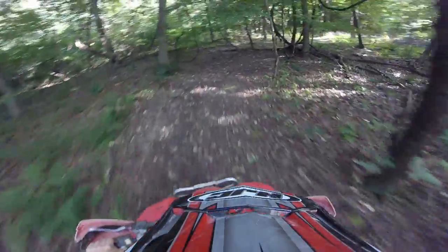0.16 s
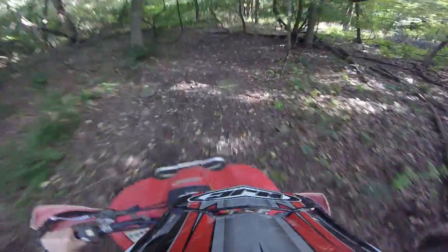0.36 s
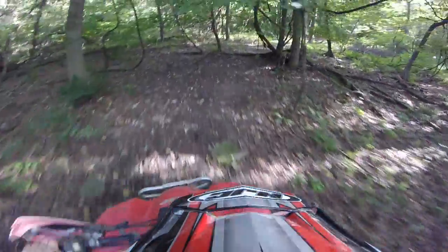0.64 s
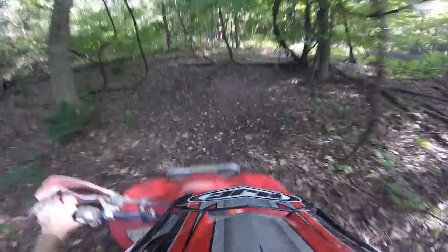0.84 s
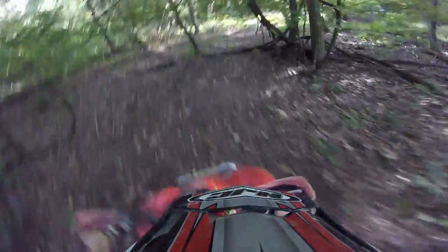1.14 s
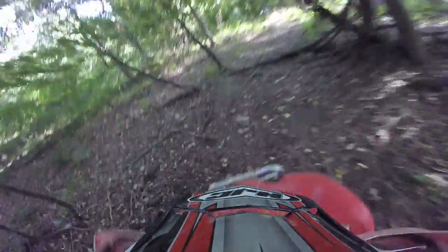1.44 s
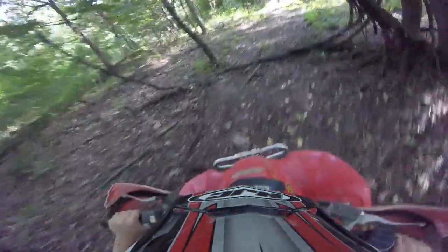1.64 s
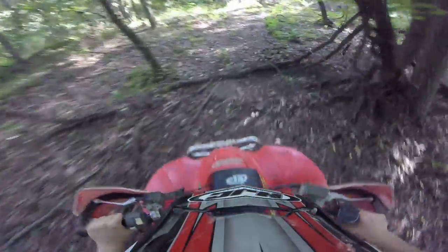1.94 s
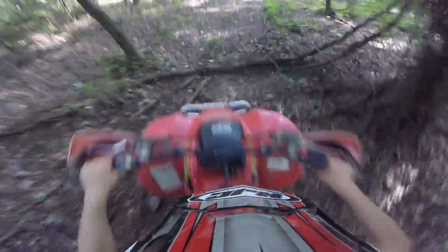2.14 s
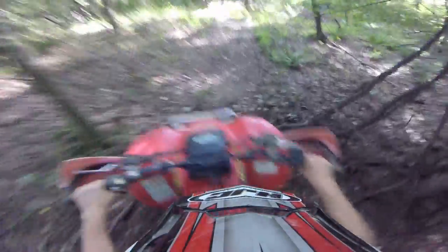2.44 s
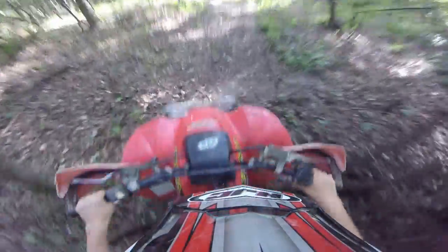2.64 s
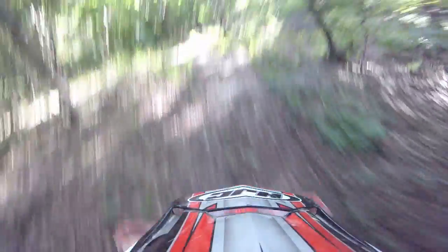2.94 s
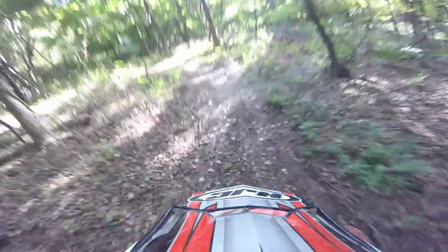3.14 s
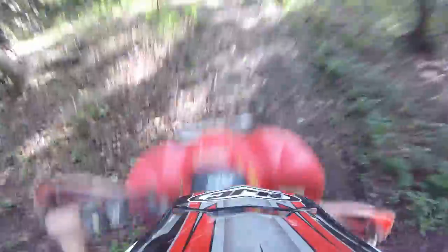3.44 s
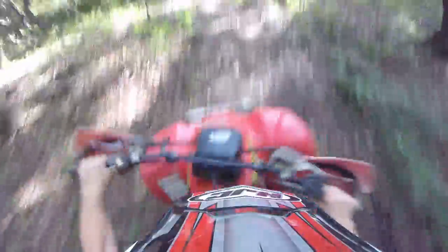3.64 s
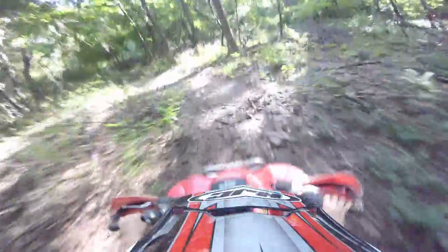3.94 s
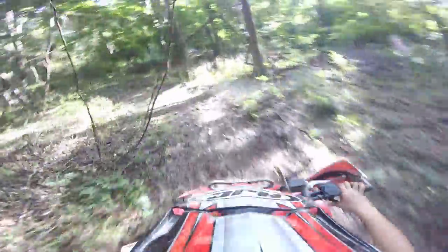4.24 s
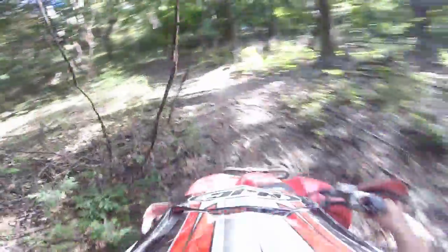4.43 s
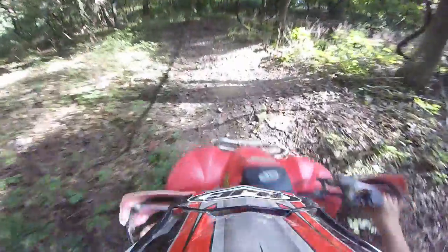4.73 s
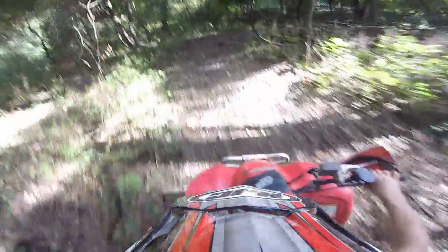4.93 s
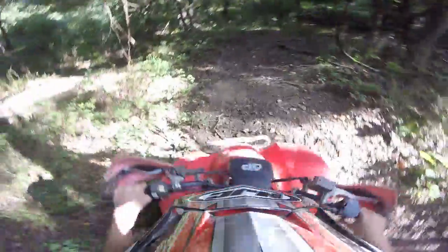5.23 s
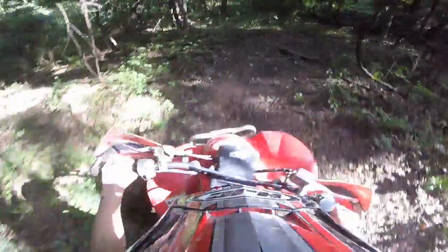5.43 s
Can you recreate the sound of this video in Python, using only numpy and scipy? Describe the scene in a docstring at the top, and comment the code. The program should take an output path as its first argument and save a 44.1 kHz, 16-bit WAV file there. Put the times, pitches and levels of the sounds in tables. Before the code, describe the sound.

Heard from the rider's helmet, a throaty quad throbs, drops to a rough sputter, then pulls harder amid clatter and bumps.

```python
"""Quad on a forest trail

A single-cylinder quad is ridden along a forest trail; the microphone sits in a closed housing on the helmet.
Each engine cycle drives an exhaust boom, an intake gulp and a bark: pulses and noise ringing the pipes and airbox.
Metal clatter is ticks over hiss, coloured by the housing; it rises with speed and throttle.
Blows ring the housing with a brief scrape; twigs snap, litter ticks and thin whistles pass as short or
narrow-band noise. Bumps over roots ring the frame low, above filtered noise for wind and tyre rumble."""
import sys
import numpy as np
from scipy import signal
from scipy.io import wavfile

SR = 44100
rng = np.random.default_rng(int(sys.argv[2]) if len(sys.argv) > 2 else 0)


def unload_wav(signal):
    """Save mono or channel-first audio to the path in sys.argv[1] as 16-bit WAV at rate SR, clipped to [-1, 1]."""
    wavfile.write(
        sys.argv[1],
        SR,
        np.round(np.clip(np.atleast_2d(signal).T, -1, 1) * 32767).astype(np.int16),
    )


N = 246063
REFERENCE_SPEED = 40   # firings per s at which the level rules start


def from_db(db):
    """Amplitude gain of a level in dB."""
    return 10 ** (np.asarray(db) / 20)


def rms_one(x):
    """Signal scaled to rms 1."""
    return x / np.sqrt(np.mean(x ** 2) + 1e-20)


def noise():
    """White noise of rms 1."""
    return rng.standard_normal(N)


def curve(rows):
    """Straight lines through (t/s, value), at every sample."""
    t, values = np.transpose(rows)
    return np.interp(np.arange(N) / SR, t, values)


def band(x, low_hz, high_hz, order=2):
    """Butterworth band-pass."""
    return signal.sosfilt(signal.butter(order, [low_hz, high_hz], "band", fs=SR, output="sos"), x)


def resonate(x, modes, twice=False, step=-1):
    """Two-pole resonances side by side, each gain times step ** index; run twice they have steep skirts."""
    out = 0
    for k, (hz, width_hz, db) in enumerate(modes):
        r = np.exp(-np.pi * width_hz / SR)
        b = (1 - r * r) / 2 * np.array([1, 0, -1])
        a = [1, -2 * r * np.cos(2 * np.pi * hz / SR), r * r]
        y = signal.lfilter(b, a, x + 1e-18)
        if twice:
            y = signal.lfilter(b, a, y)
        out = out + step ** k * from_db(db) * y
    return out


def decay(x, time_s, poles=2):
    """Exponential decay after each click; two poles also make the rise soft."""
    return signal.lfilter([1], np.poly([np.exp(-1 / (time_s * SR))] * poles), x)


def lagged(x, lag_s):
    """One-pole lag, settled at the start."""
    r = np.exp(-1 / (lag_s * SR))
    return signal.lfilter([1 - r], [1, -r], x, zi=[r * x[0]])[0]


def clicks_at(events):
    """One single-sample click per (t/s, level/dB)."""
    out = np.zeros(N)
    for s, db in events:
        out[round(s * SR)] = from_db(db)
    return out


def level(rule, per_s, throttle):
    """Gain from (dB at reference speed with throttle shut, dB per octave of speed, dB added by full throttle)."""
    base_db, octave_db, throttle_db = rule
    return from_db(base_db + octave_db * np.log2(per_s / REFERENCE_SPEED) + throttle_db * throttle)


WIND_LEVEL = (-45.5, 2.5, 0.5)   # level rule


def wind(per_s, throttle):
    """Lumpy pressure on the housing: very low noise whose level wanders with slower noise."""
    gust_db, gusts_per_s = 9, 8.7   # rms swing, fastest wander
    gusts = rms_one(band(noise(), 0.53, gusts_per_s, order=1))
    pressure = from_db(gust_db * gusts) * band(noise(), 5.0, 28.5)
    return level(WIND_LEVEL, per_s, throttle) * rms_one(pressure)


def tyres():
    """Steady rumble of the trail: low band-passed noise."""
    return from_db(-46.5) * rms_one(band(noise(), 84, 236, order=1))


def litter():
    """Dry leaves and grit tick at random, high and faint: short decays of noise."""
    sizes = from_db(4.7 * np.minimum(rng.exponential(1, N), 3))
    born = (rng.random(N) < 25 / SR) * sizes   # 25 ticks per s on average
    return from_db(-59.0) * band(decay(born, 0.0016, poles=1) * noise(), 7600, 10600)


# thin whistles: t/s, f/Hz, length/s (from the middle to a gain of e^-2), level/dB (rms at the middle)
WHISTLES = [(1.25, 3110, 0.036, -47.5), (2.303, 12700, 0.014, -61), (2.937, 10600, 0.023, -59.5),
            (3.76, 12600, .015, -55), (3.96, 12700, .012, -63), (3.35, 2440, 0.33, -47),
            (5.294, 3260, .02, -35.5)]


def whistles():
    """Parts whistle thinly: noise in a narrow band under a bell-shaped envelope."""
    t, out = np.arange(N) / SR, 0
    for s, hz, length_s, db in WHISTLES:
        thin = rms_one(resonate(noise(), [(hz, 200, 0)], twice=True))
        out = out + from_db(db) * np.exp(-2 * ((t - s) / length_s) ** 2) * thin
    return out


# twigs by the trail: t/s, level/dB (of the click, relative)
TWIGS = [(0.3506, -35), (1.2057, -35), (1.2214, -44), (1.249, -50), (2.7624, -34), (2.7794, -38.5),
         (3.0844, -59), (4.4664, -47)]
# middle and high resonances of the closed housing: f/Hz, width/Hz, level/dB (relative)
HOUSING_MIDDLE = [(2292, 150, 1), (2553, 71, 7), (2576, 460, 0), (3353, 236, 2), (3665, 270, -4),
                  (4106, 156, -0.5), (4965, 280, -16)]
HOUSING_TOP = [(5690, 90, -6), (6327, 740, 2), (7250, 630, -5), (7640, 2160, -11.5), (12600, 1800, -51)]


def snaps():
    """Twigs crack: noise that dies in a few milliseconds, coloured by the housing."""
    crack = decay(clicks_at(TWIGS), 0.0012) * noise()
    middle = from_db(-11.0) * resonate(crack, HOUSING_MIDDLE)
    top = from_db(-17.0) * resonate(crack, HOUSING_TOP, twice=True)
    return middle + top + from_db(-39) * band(crack, 9200, 13300)


# wheels over roots: t/s, level/dB (of the click, relative)
ROOTS = [(2.8665, -22.5), (4.99, -34), (5.088, -32)]


def bumps():
    """Each root strikes the frame, which rings low for a few cycles."""
    return from_db(54.5) * band(resonate(clicks_at(ROOTS), [(106.0, 15, 0)]), 65, 320)


# blows on the housing round the microphone: t/s, level/dB (of the click, relative)
BLOWS = [(0.7864, -25.5), (0.828, -26), (1.0609, -34), (1.0914, -31), (1.2501, -31), (1.3052, -22.5),
         (1.4104, -27.5), (1.421, -39.5), (1.5404, -36.5), (1.566, -33.5), (2.2744, -36), (2.7796, -32),
         (2.8022, -29.5), (2.9697, -25.5), (3.015, -30), (3.1044, -29), (3.2525, -22), (3.261, -15),
         (3.2714, -41), (3.436, -29), (4.1639, -28), (4.9424, -41), (5.3574, -23), (5.3653, -17.5),
         (5.3732, -22.5)]


def knocks():
    """A soft blow rings the lowest housing modes, and scrapes the middle ones for a moment."""
    blows = clicks_at(BLOWS)
    rung = resonate(blows, [(1322, 95, 1), (1530, 346, -7)], twice=True)
    scrape = decay(blows, 0.0018) * noise()
    return from_db(45.5) * rung + from_db(-35.5) * resonate(scrape, HOUSING_MIDDLE)


# low resonances of the housing: f/Hz, width/Hz, level/dB (relative)
HOUSING_BOTTOM = [(1120, 200, -13), (1330, 190, 0), (1540, 190, -1), (1785, 110, -4), (2010, 90, -17)]
# how hard the trail shakes the metal: t/s, level/dB (added to the clatter)
TRAIL_SHAKING = [(0, 1.5), (.1, -0.5), (.5, -0.5), (.8, -1.5), (1.1, -0.5), (1.3, 4.5), (1.5, 2.5),
                 (1.6, 6), (1.79, 0.5), (2.0, 0.5), (2.6, 0.5), (2.72, -2.5), (2.79, 4), (2.88, 0),
                 (3.2, -1), (3.55, 1), (3.9, -0.5), (4.3, -1.5), (4.7, 0.5), (5.0, -1), (5.3, 0),
                 (5.58, -1.5)]
# level rules of the clatter, before the shaking
CLATTER_LOW, CLATTER_MIDDLE, CLATTER_HIGH = (-38, 11.3, 4.4), (-45, 13.3, 3.94), (-51.5, 15.2, 2.3)


def clatter(turns, per_s, throttle):
    """Valves, chain and panels: dense uneven ticks over hiss, swelling at one point of the cycle."""
    swell = np.cos(2 * np.pi * (turns - .3))
    sizes = from_db(3.2 * np.minimum(rng.exponential(1, N), 4)) * rng.choice([-1, 1], N)
    ticks_per_s = 1500 * (1 + .6 * swell)
    ticks = rms_one(sizes * (rng.random(N) < ticks_per_s / SR))
    shake = rms_one(band(noise(), 4.5, 36, order=1))   # loose parts shake unevenly over the ruts
    low = (.5 * ticks + noise()) * from_db(0.14 * swell + 0.98 * shake)
    middle = (0.51 * ticks + noise()) * from_db(0.18 * swell + 0.75 * shake)
    high = (0.72 * ticks + noise()) * from_db(1.1 * swell + 1.03 * shake)
    low = level(CLATTER_LOW, per_s, throttle) * rms_one(resonate(low, HOUSING_BOTTOM, twice=True))
    middle = level(CLATTER_MIDDLE, per_s, throttle) * rms_one(resonate(middle, HOUSING_MIDDLE))
    high = level(CLATTER_HIGH, per_s, throttle) * rms_one(resonate(high, HOUSING_TOP, twice=True))
    return from_db(curve(TRAIL_SHAKING)) * (low + middle + high)


# deep gulps as the engine picks up again: t/s, f/Hz, level/dB (before the fade)
DEEP_GULPS = [(3.013, 212, -20), (3.076, 230, -28), (3.104, 237, -24), (3.132, 251, -25)]


def gulps():
    """Each rings low for a few cycles: a decaying sine with a soft start."""
    rise_s, t60_s = .005, 0.055   # start, time to fall 60 dB
    out = np.zeros(N)
    t = np.arange(SR // 10) / SR
    rise = np.minimum(t / rise_s, 1)
    for s, hz, db in DEEP_GULPS:
        ring = from_db(db - 60 * t / t60_s) * rise * np.sin(2 * np.pi * hz * t)
        out[round(s * SR):][:len(t)] += ring
    return out


def roughness(throttle):
    """Unevenness of the firing: 0.6 with the throttle shut, 0.06 under load, settling after the throttle."""
    rough_shut, rough_open, settle_s = .6, .06, .04
    loaded = lagged(np.clip(2 * throttle - .6, 0, 1), settle_s)
    return rough_shut + (rough_open - rough_shut) * loaded


def firings(turns, per_s, rough, spread_db, late_s):
    """One pulse a cycle of equal power at any speed; spreads of strength and timing are per unit of roughness."""
    at = np.flatnonzero(np.diff(np.floor(turns)))
    chance = rng.standard_normal((len(at), 2))
    shift = (late_s * SR * rough[at] * chance[:, 0]).astype(int)
    out = np.zeros(N)
    out[np.clip(at + shift, 0, N - 1)] = from_db(spread_db * rough[at] * chance[:, 1]) / np.sqrt(per_s[at])
    return out


# strokes that miss or catch: t/s, level/dB (added to the intake pulse)
UNEVEN_STROKES = [(.345, 5.5), (.385, 4.5), (1.595, 5), (1.635, -8), (1.68, 5), (1.72, -8), (1.765, 6.5),
                  (1.81, -3), (3.045, -12)]


def odd_strokes(per_s):
    """Gain that holds for one cycle around each odd stroke."""
    t = np.arange(N) / SR
    return from_db(sum(db * (np.abs(t - s) < .5 / per_s) for s, db in UNEVEN_STROKES))


# airbox and intake tract resonances: f/Hz, width/Hz, level/dB (relative, before 0.82 per further mode)
AIRBOX_MODES = [(227, 60, -29), (270.7, 70.5, -5), (292.8, 50, 4)]
INTAKE_MODES = [(331.9, 41, 12.5), (367, 85, -10), (430, 35, -7), (636, 43, -4), (744, 71, -12)]
# gas rushing out: f/Hz, width/Hz, level/dB (relative)
RASP_MODES = [(652, 170, 3.5), (790, 790, -1.5)]
AIRBOX_LEVEL, TRACT_LEVEL = (-43.5, 7.4, 15.86), (-43.5, 15.3, 5.9)   # level rules


def intake(turns, per_s, throttle, rough):
    """Gulps and turbulent air ring airbox and tract; noise puffed by the gas flow adds a rasp."""
    delay_s = .0022 + .007 * rough   # later when running rough
    pulses = firings(turns - .08 - delay_s * per_s, per_s, rough, spread_db=5.0, late_s=.001)
    turbulence = (.07 + .42 * rough) * noise()
    drive = rms_one(pulses * odd_strokes(per_s)) + turbulence
    box = rms_one(resonate(drive, AIRBOX_MODES, twice=True, step=0.82))
    tract = rms_one(resonate(drive, INTAKE_MODES, twice=True, step=0.82))
    puffs = rms_one(decay(pulses, 0.014))   # rise and fall of the gas flow
    rasp = rms_one(resonate((.5 + puffs) * noise(), RASP_MODES))
    breath = level(TRACT_LEVEL, per_s, throttle) * (tract + from_db(-16) * rasp)
    return level(AIRBOX_LEVEL, per_s, throttle) * box + breath


# frame, exhaust and upper pipe resonances: f/Hz, width/Hz, level/dB (relative)
FRAME_MODES = [(49, 60, -3), (82, 32.6, 2.5)]
EXHAUST_MODES = [(118.6, 41, -3), (135, 58, -14.5)]
BARK_MODES = [(452, 62, 5), (650, 90, -3.5), (790, 153, -1.5), (1140, 220, -13.5)]
# exhaust boom: t/s, level/dB (rms gain)
BOOM_LEVEL = [(0.0, -37.5), (0.42, -34), (0.53, -47), (0.64, -37.5), (1.01, -33), (1.33, -43), (1.43, -39),
              (1.82, -45), (1.99, -38.5), (2.14, -39), (2.78, -31), (2.83, -36), (2.89, -35.5), (2.95, -41),
              (3.11, -51), (3.2, -32.5), (3.51, -31), (4.27, -37.5), (4.32, -34.5), (4.94, -32),
              (5.13, -31), (5.19, -34.5), (5.47, -31.5), (5.58, -38)]
THROB_LEVEL, BARK_LEVEL = (-46, 3.7, 6.7), (-61, 3, 12)   # level rules


def exhaust(turns, per_s, throttle, rough):
    """Firing pulses and turbulence throb the frame and boom in the pipe; later pulses bark in its upper modes."""
    pulses = -firings(turns + .09, per_s, rough, spread_db=1.5, late_s=.0006)
    drive = rms_one(pulses) + .5 * rough * noise()
    throb = rms_one(resonate(drive, FRAME_MODES, twice=True))
    boom = rms_one(resonate(drive, EXHAUST_MODES, twice=True))
    late = turns - .17 - .09   # shares of a cycle
    bark_pulses = firings(late, per_s, rough, spread_db=5.0, late_s=0.0012)
    bark = rms_one(resonate(bark_pulses, BARK_MODES, twice=True))
    pipe = from_db(curve(BOOM_LEVEL)) * boom + level(BARK_LEVEL, per_s, throttle) * bark
    return level(THROB_LEVEL, per_s, throttle) * throb + pipe


def engine(turns, per_s, throttle):
    """Exhaust and intake sound once a cycle, sharing one roughness."""
    rough = roughness(throttle)
    return exhaust(turns, per_s, throttle, rough) + intake(turns, per_s, throttle, rough)


# engine speed: t/s, f/Hz (firings per s)
FIRING_RATE = [(0.0, 35.15), (0.16, 31.89), (0.38, 32.32), (0.48, 30.4), (0.64, 40.31), (0.96, 44.18),
               (1.12, 30.8), (1.48, 24.57), (1.78, 22.91), (1.9, 30.04), (2.04, 33.62), (2.56, 45.69),
               (3.04, 30.08), (3.22, 47.23), (3.32, 46.25), (3.48, 50.55), (3.84, 50.06), (3.92, 53.32),
               (4.12, 47.84), (4.24, 48.25), (4.48, 37.57), (4.66, 48.7), (4.78, 48.08), (4.88, 52.22),
               (5.04, 53.45), (5.12, 57.56), (5.22, 53.86), (5.28, 56.97), (5.44, 42.54), (5.58, 37.52)]
# throttle: t/s, opening (0-1)
THROTTLE_OPENING = [(0, 0.4), (.33, 0.35), (.39, .55), (.5, 0), (.54, 0.67), (.95, 0.93), (.99, 0.61),
                    (1.15, 0.49), (1.2, 0), (1.81, 0), (1.85, 0.88), (2.2, 1), (2.61, 0.81), (2.67, 0.35),
                    (2.9, 0.05), (2.99, .2), (3.03, 0.83), (3.2, 0.66), (3.55, 0.83), (3.8, 0.8),
                    (3.92, 0.65), (4.24, 0.69), (4.28, 0.55), (4.48, 0.14), (4.52, 0.86), (4.82, 0.86),
                    (5.2, 0.66), (5.31, 0.78), (5.45, 0.4), (5.58, 0.53)]


def scene():
    """All sources at the one microphone on the helmet."""
    per_s = curve(FIRING_RATE)
    throttle = np.clip(curve(THROTTLE_OPENING), 0, 1)
    lead_s = .005   # fire early: the pipes take this long to answer
    turns = np.cumsum(per_s) / SR + lead_s * per_s + .68   # engine cycles
    metal = clatter(turns, per_s, lagged(throttle, 0.017))   # the metal follows the throttle 17 ms late
    trail = wind(per_s, throttle) + tyres() + litter() + whistles() + snaps() + bumps() + knocks()
    mix = trail + metal + gulps() + engine(turns, per_s, throttle)
    return mix[None]


def record(dry):
    """A steep low-pass cuts the top, 60 dB down from 15650 Hz."""
    return signal.sosfilt(signal.cheby2(16, 60, 15650, fs=SR, output="sos"), dry)


dry = scene()
out = record(dry)
unload_wav(out)
```